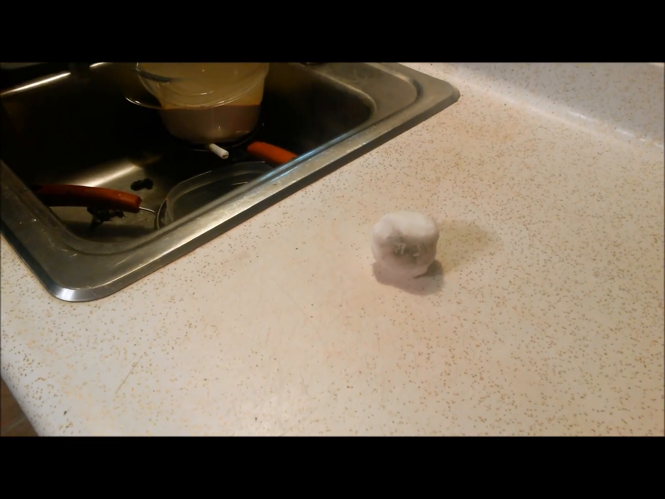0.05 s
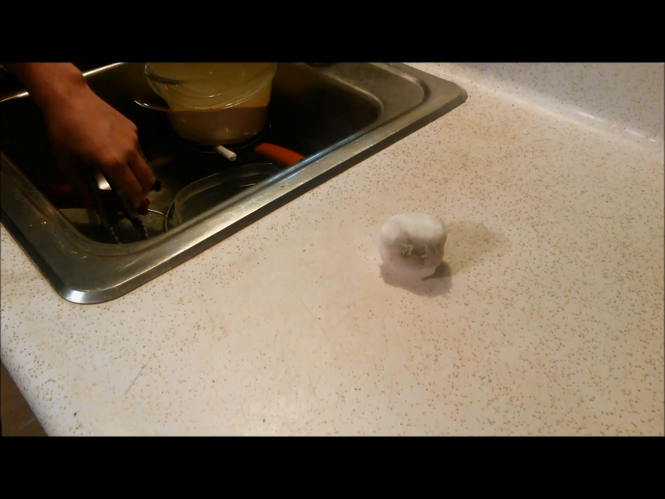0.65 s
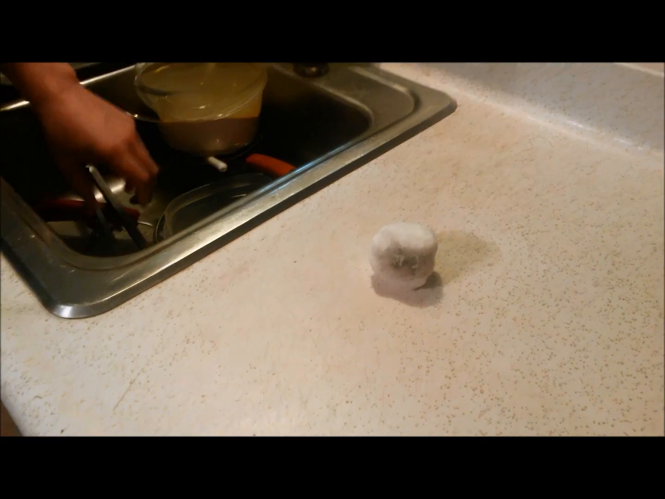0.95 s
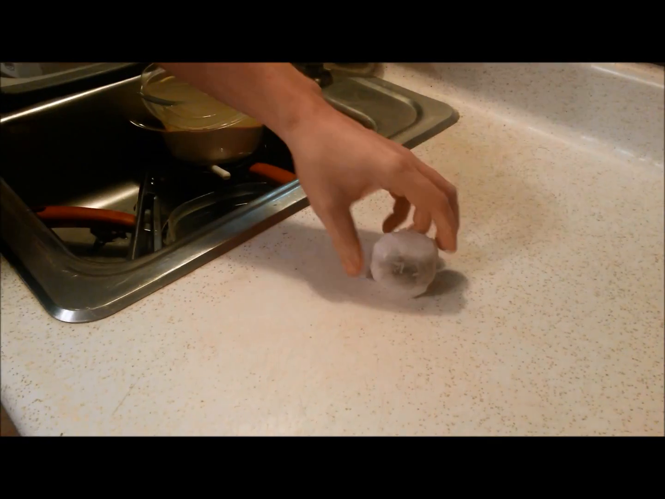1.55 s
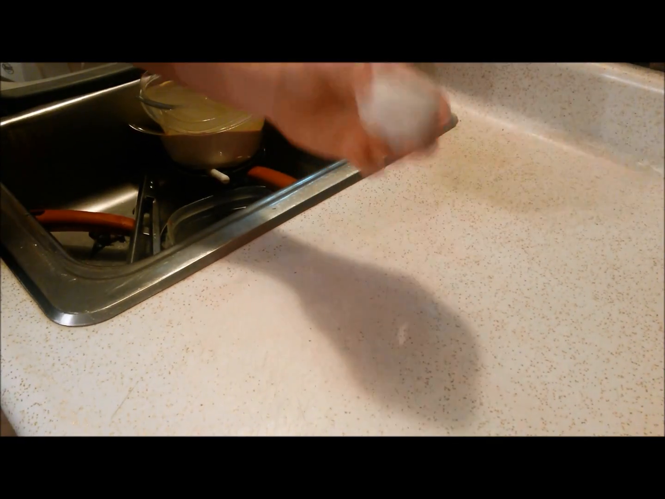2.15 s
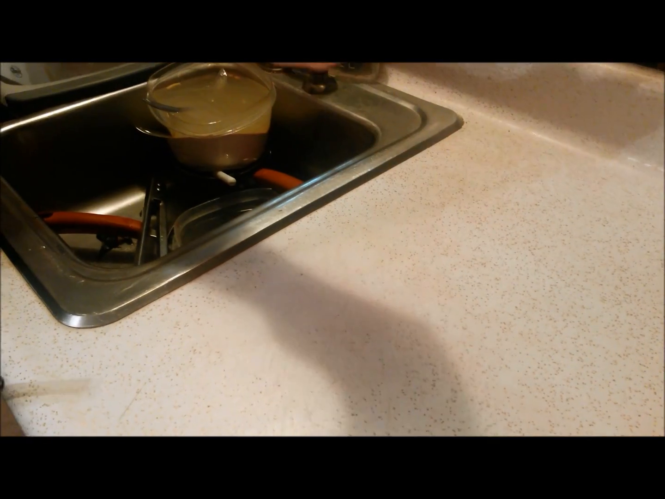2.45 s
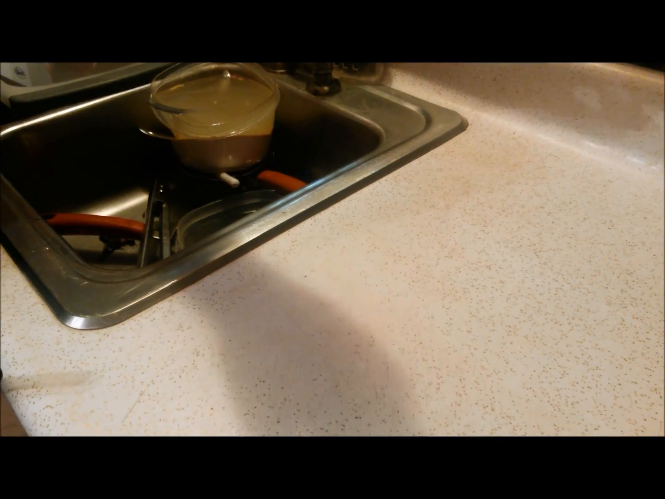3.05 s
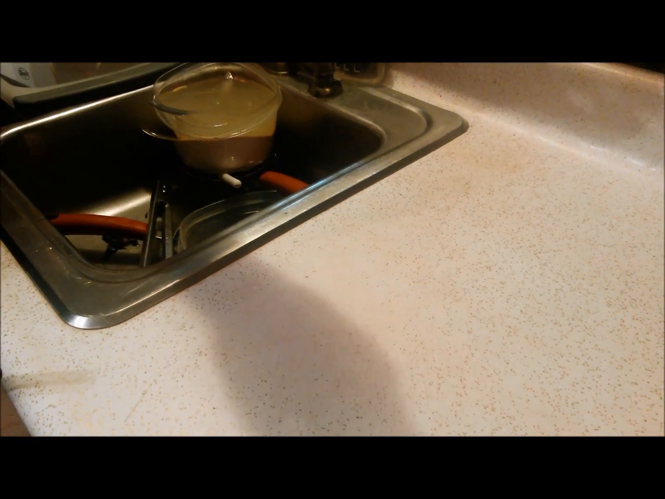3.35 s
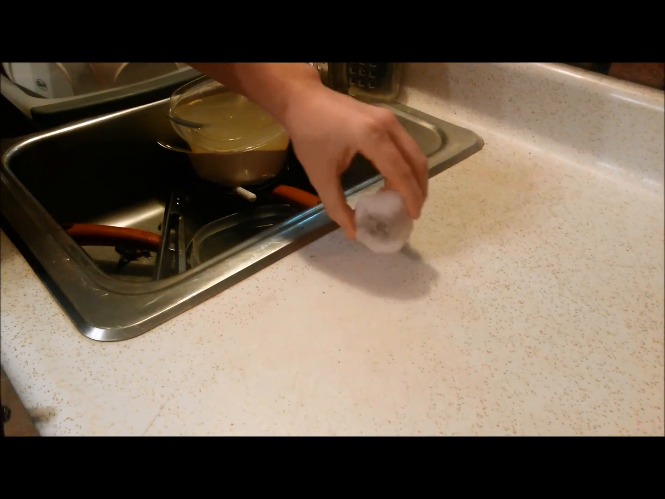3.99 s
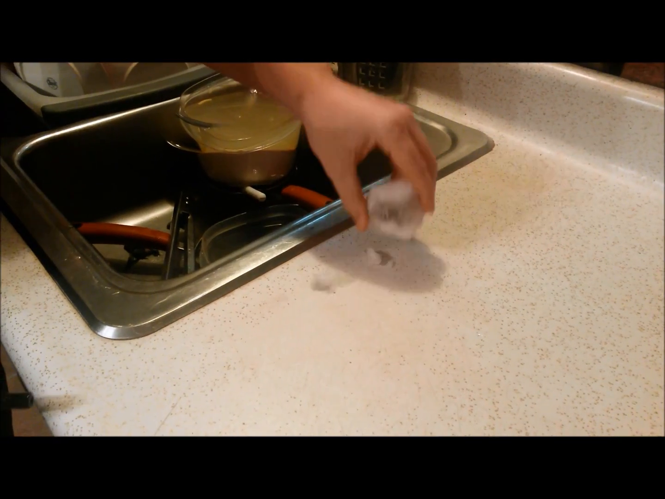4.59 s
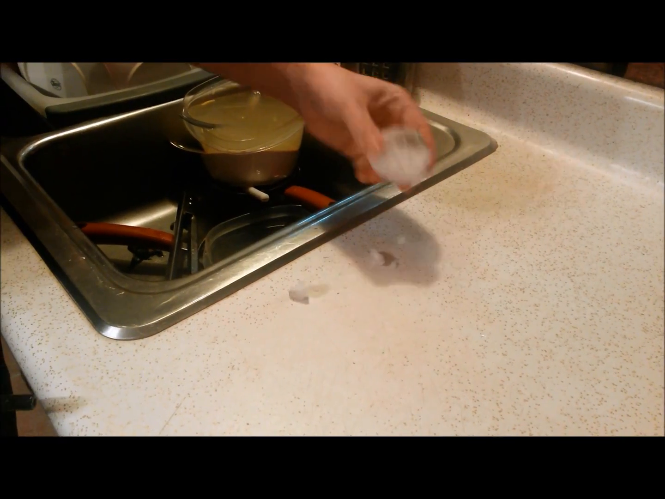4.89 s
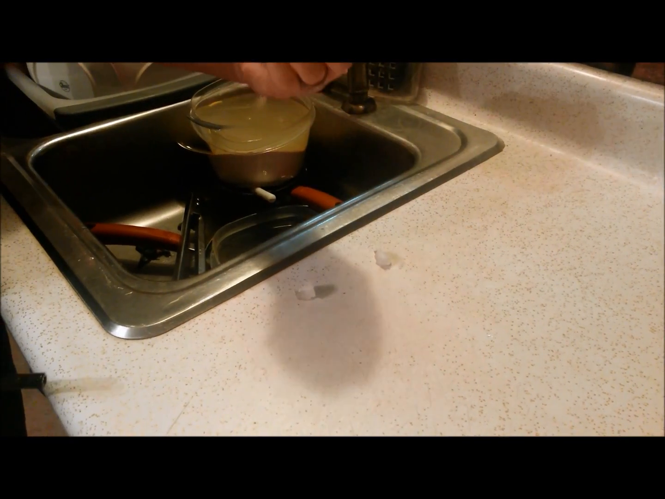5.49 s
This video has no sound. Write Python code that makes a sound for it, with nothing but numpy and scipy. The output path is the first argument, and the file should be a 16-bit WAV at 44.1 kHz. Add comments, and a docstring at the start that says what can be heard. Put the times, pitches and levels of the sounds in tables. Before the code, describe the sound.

In a small kitchen, steel tongs clatter loudly into a steel sink, ringing, then scraping to rest. After a tiny sharp tick and a quieter stretch of soft shuffles, a garlic bulb is knocked four times on the counter, thudding as its dry skin crackles and gives way. Low rumble and sleeve rustle lie underneath, and the nearby camera microphone picks up faint chirps from its focus motor.

```python
"""A small kitchen. Steel tongs clash in a steel sink, ringing arms and basin, then stick and slip to
rest against its wall. A hand lifts a garlic bulb and knocks it four times on the counter, ringing
the slab; the dry skin cracks in runs of tiny snaps and gives way. Low rumble, sleeve rustle and soft
shuffles lie beneath. Heard through the two unlike microphones of a camera whose focus motor chirps."""
import sys
import numpy as np
from scipy import signal
from scipy.fft import rfft, irfft
from scipy.io import wavfile
from scipy.ndimage import uniform_filter1d

SR = 44100
rng = np.random.default_rng(int(sys.argv[2]) if len(sys.argv) > 2 else 0)


def to_wav(sig):
    """Store sig (one row per channel, or 1-D mono) as 16-bit WAV at the path in sys.argv[1].

    Samples outside -1..1 are clipped; the rate is SR.
    """
    pcm = np.clip(np.atleast_2d(sig), -1, 1) * 32767
    pcm = np.round(pcm).astype(np.int16)
    wavfile.write(sys.argv[1], SR, pcm.T)  # frames by channels


N = 248283
TIME_S = np.arange(N) / SR
EVENT_S = TIME_S[:SR // 2]  # time axis of one event

# Tongs on sink. Each row: start in seconds, steel level in dB, tilt in dB per octave,
# relative basin level in dB, basin centre in Hz, ring time factor.
CLASHES = [(0.6967, -23.5, 0, -18, 206, 0.44), (0.7655, -28, -2, -19, 210, 0.49),
           (.793, -24.5, -4.5, -26.5, 235, 0.29), (.938, -10, -3, -13.5, 268, 0.19),
           (.948, -16, -1.5, -31.5, 300, 0.22), (0.9871, -10.5, 0, -22.5, 485, 0.66),
           (1.0432, -11, 0, -18.5, 456, 0.39), (1.070, -18.5, 0, -41.5, 500, 0.57),
           (1.096, -20, -2.5, -22, 436, 0.34), (1.24, -23, 1.5, -41, 290, 0.3),
           (1.272, -22.5, 0.5, -41, 274, 0.31), (1.3276, -27, 0.5, -36, 288, 0.47),
           (1.5047, -30.5, -3.5, -28, 215, 0.5), (1.578, -19.5, 4, -45, 260, 0.37)]
# Tongs dragging. Each row: start in seconds, length in seconds, scrape level in dB, tilt in dB per
# octave, basin drone level in dB, swell in dB per second, left minus right in dB.
DRAGS = [(.80, 0.14, -47, -2.5, -49, -62.5, 6), (1.126, 0.09, -27, -2.5, -30, -82.5, 12.5),
         (1.232, 0.14, -38, -2, -43.5, -7, 6), (1.372, 0.114, -38, 0.5, -39, 13, 5.5),
         (1.491, 0.15, -36, 0.5, -39, -4, -1), (1.622, 0.023, -26.5, 1, -38.5, -23.5, 2.5)]
# Modes of basin, tongs and counter. Each row: frequency in Hz, relative level in dB, T60 in seconds.
BASIN_MODES = [(78, -2, .3), (142, -4, .35), (186, -2, .45), (214, -2, .35), (243, -2, .35), (281, -8, .4),
               (351, -1, .55), (385, -10, .35), (437, 2, .6), (492, -11, .35), (544, -3, .6), (570, -4, .5),
               (639, -1, .45), (679, 0, .35), (770, -9, .3), (975, 3, .45), (1290, 0, .4), (1600, 5, .4)]
TONG_MODES = [(1715, -2, .3), (2245, -7, .45), (2347, -11, .6), (3429, -10, .25), (3828, 3, .3),
              (3967, 1, .28), (4253, -8, .3), (4850, -13, .33), (5230, -10, .7), (5491, -8, .6),
              (5519, -7, .6), (6115, -11, .36), (6880, -12, .35), (7321, -13, .25), (8524, -6, .22),
              (9098, -15, .2), (9442, -14, .45), (10010, -14, .18)]
COUNTER_MODES = [(55.5, -27, 0.48), (77, -15, 0.074), (143.6, 7.5, 0.066), (171, -1, 0.041),
                 (213.7, -3.5, 0.15), (244, -5.5, 0.045), (302.1, -12.5, 0.28), (373, -17, 0.16),
                 (504, -17.5, 0.11), (563, -30.5, 0.42), (770, 6.5, 0.022), (842, -26, 0.17),
                 (1148, -18, 0.26), (1334, -6, 0.067)]
# Bulb on counter. Each row: start in seconds, level in dB, hardness as a cut-off in Hz,
# ring time factor, left minus right in dB.
KNOCKS = [(3.9425, -21, 197, 0.95, 0), (4.141, -12.5, 470, 0.55, 0), (4.3381, -13.5, 363, 0.72, 0.5),
          (4.571, -19.5, 123, 0.9, 3)]
# Skin cracks. Each row: start in seconds, level in dB, length in seconds.
CRACKS = [(.392, -56, 0.0023), (1.9427, -30, 0.00029), (3.940, -32.5, 0.0097), (4.1408, -25.5, 0.0077),
          (4.3374, -15, 0.0015), (4.34, -26.5, 0.0042), (4.433, -39, 0.0016), (4.555, -33.5, 0.012),
          (4.564, -32, 0.021), (4.684, -48.5, 0.0045), (4.7146, -41, 0.0025), (4.805, -58.5, .034)]
# Hand on counter, last as the bulb gives way. Each row: start in seconds, level in dB,
# push time in seconds, hardness as a cut-off in Hz, left minus right in dB.
BUMPS = [(2.8165, -26, 0.0022, 520, 13), (3.302, -26.5, 0.0028, 280, 10), (4.573, -14, 0.002, 1110, 18.5)]
# Finger strokes. Each row: peak time in seconds, relative level in dB, half length in seconds.
RUBS = [(0.015, -62, 0.089), (1.98, -62, 0.082), (2.45, -64, .25), (2.853, -57, .025), (3.07, -59, 0.042),
        (3.537, -61.5, 0.14), (3.745, -51.5, 0.066), (4.5, -46, .015), (4.71, -57.5, 0.13)]
# Soft shuffles. Each row: start in seconds, level in dB, centre in Hz, length in seconds.
SHUFFLES = [(2.237, -51.5, 150, 0.014), (2.393, -50, 500, 0.0047), (2.441, -52, 107, 0.029),
            (2.793, -50, 330, 0.0039), (3.12, -47.5, 467, 0.007), (3.807, -43.5, 503, 0.0048)]
# Focus motor runs. Each row: start in seconds, relative level in dB, length in seconds.
CHIRPS = [(0.114, -51, 0.049), (2.075, -59.5, 0.1), (2.364, -51, 0.046), (2.565, -48.5, 0.072),
          (3.023, -44.5, 0.026), (3.105, -54, 0.055), (3.499, -45.5, 0.033), (3.635, -43.5, 0.087),
          (4.272, -40, 0.049), (4.424, -42.5, 0.036), (4.51, -52, 0.18)]
# Motor resonances. Each row: frequency in Hz, width in Hz, relative level in dB.
MOTOR_BANDS = [(5420, 97, -15.5), (8010, 50, -6), (10530, 420, -10), (11570, 260, -11), (13200, 530, -11)]
# Body movement at the counter. Each row: time in seconds, relative level in dB.
MOVEMENT_DB = [(0, -0.5), (.5, -5.5), (1.95, -5.5), (2.4, 2), (2.8, 2), (3.1, -0.5), (3.75, 2), (4.7, 6),
               (5.15, -2), (5.6, 1.5)]
# Spectra of the sources and the room tail. Each row: frequency in Hz, gain in dB.
STEEL_EQ_DB = [(100, -1.5), (300, 10), (600, 4.5), (850, 1), (1000, 4), (1150, 3), (1700, 4), (1950, 5.5),
               (2300, 5.5), (3000, 3), (3900, 2), (7000, -1), (10000, -4.5), (14000, -6)]
CRACK_EQ_DB = [(200, 11), (800, -1), (2000, 7.5), (4000, 4.5), (7000, 4), (9000, 2.5), (11000, 3),
               (14000, 6)]
RUB_EQ_DB = [(500, -3), (2500, 7.5), (5000, 8), (9000, 6.5), (14000, -4)]
RUMBLE_EQ_DB = [(20, -22), (40, -13), (62, -6), (88, 2.5), (110, -4.5), (140, 1), (190, -10), (300, -16),
                (600, -30.5), (2000, -35), (8000, -61.5)]
RUSTLE_EQ_DB = [(100, -3.5), (350, -4), (700, -4), (1400, -10), (3000, -16.5), (6000, -20.5),
                (14000, -26.5)]
ROOM_EQ_DB = [(100, -7.5), (300, -3), (1000, -0.5), (3000, -11), (6000, -9), (9000, -12), (14000, -13)]
# Decay of sheet steel and room. Each row: frequency in Hz, T60 in seconds.
STEEL_T60_S = [(200, 0.22), (1500, 0.45), (4000, 0.43), (9000, 0.28), (14000, 0.26)]
ROOM_T60_S = [(100, 0.58), (400, 0.39), (1000, 0.34), (3000, 0.43), (8000, 0.29), (14000, 0.24)]
# Likeness of the two channels. Each row: frequency in Hz, left-right correlation.
MIC_CORRELATION = [(40, 1), (130, 0.95), (300, 0.68), (700, 0.24), (1500, 0.24), (3000, 0), (14000, 0.28)]
# Left microphone muffled, right port ringing in the treble. Each row: frequency in Hz, gain in dB.
LEFT_MIC_DB = [(60, 2.5), (200, -0.5), (500, -1), (1000, -5.5), (2000, -3.5), (3800, 2), (5300, 1.5),
               (6200, -8), (7500, -12), (9000, -48.5), (14000, -58.5)]
RIGHT_MIC_DB = [(60, 2), (200, 2.5), (500, 3), (1000, 1.5), (3000, -1), (5000, 0.5), (6800, 4), (7700, 5),
                (8600, 14), (9300, 16), (10300, 7), (11500, 3.5), (14000, -1.5)]


def clashes(ripple, basin_trim_db=-4, highpass_hz=110, chatter_s=0.0022, side_db=4):
    """Blows build as the loose arms chatter; a holding hand cuts the ring short."""
    out = np.zeros((2, N))
    for start_s, steel_db, tilt_db_oct, basin_db, centre_hz, ring in CLASHES:
        clang = amp(steel_db) * tilted(sheet_steel(ripple, ring) + tongs(ring), tilt_db_oct)
        boom = amp(basin_db + basin_trim_db) * basin(centre_hz, ring)
        add(out, start_s, (clang + boom) * np.minimum(EVENT_S / chatter_s, 1))
    return pan(side_db) * butterworth(out, highpass_hz, "high")  # thin steel gives little deep bass


def sheet_ripple(ripple_db=3.3, smooth_bins=24):
    """Hundreds of unequal sheet modes: one random pattern of peaks for all blows."""
    peaks = unit(uniform_filter1d(rng.standard_normal(SR // 4 + 1), smooth_bins))
    return unit(amp(ripple_db * peaks.clip(-2, 2)))


def sheet_steel(ripple, ring):
    """One touch rings the dense modes of the thin steel."""
    modes = irfft(rfft(stereo_noise(len(EVENT_S))) * ripple)
    return colour(decay(modes, STEEL_T60_S, ring), STEEL_EQ_DB)


def tongs(ring, level_db=-16):
    """The arms ring in clear lines."""
    phases_rad = rng.uniform(0, 2 * np.pi, (2, 1, len(TONG_MODES)))
    return amp(level_db) * ringing(TONG_MODES, ring=ring, phases_rad=phases_rad)


def basin(centre_hz, ring, width_oct=0.55, upper_db=-16, hz_per_rad=550):
    """The contact spot picks the modes; high ones reach the microphones out of step."""
    hz = np.transpose(BASIN_MODES)[0]
    near = 1 / (1 + (np.log2(hz / centre_hz) / width_oct) ** 4)
    gains = np.maximum(near, amp(upper_db) * (hz > centre_hz))  # hard steel always stirs upper modes
    shared_rad = rng.uniform(0, 2 * np.pi, len(hz))
    skew_rad = rng.uniform(-1.3, 1, (2, 1, len(hz))) * hz / hz_per_rad
    return ringing(BASIN_MODES, gains, ring, shared_rad + skew_rad, rise_cycles=0.25)


def drags(ripple, attack_s=0.006, release_s=0.0044, highpass_hz=65):
    """Steel sticks and slips on steel; each drag catches, swells or eases, and stops."""
    out, t = np.zeros((2, N)), EVENT_S
    for start_s, length_s, scrape_db, tilt_db_oct, drone_db, swell_db_per_s, side_db in DRAGS:
        pressure = np.minimum(t / attack_s, 1) * amp(swell_db_per_s * np.minimum(t, length_s))
        release = np.exp(-np.maximum(t - length_s, 0) / release_s)
        slips = grains(len(t), per_s=1400, spread_db=3) * pressure * release
        drone = basin(centre_hz=140, ring=0.22, width_oct=1.0, upper_db=-12)
        drone = unit(butterworth(drone, highpass_hz, "high"))
        scrape = tilted(unit(sheet_steel(ripple, ring=0.26)), tilt_db_oct)
        body = amp(scrape_db) * scrape + amp(drone_db) * drone
        add(out, start_s, pan(side_db) * convolve(slips, body / np.sqrt(len(t))))
    return out


def knocks(spot_spread_db=2):
    """The bulb thuds on the slab, which swings up over a cycle; harder blows reach higher modes."""
    out = np.zeros((2, N))
    hz = np.transpose(COUNTER_MODES)[0]
    signs = (-1) ** np.arange(len(hz))  # neighbouring modes move in opposition
    for start_s, level_db, cutoff_hz, ring, side_db in KNOCKS:
        spot = amp(spot_spread_db * rng.standard_normal(len(hz)))  # each spot favours other modes
        gains = spot * signs / np.hypot(1, hz / cutoff_hz)
        thud = ringing(COUNTER_MODES, gains, ring, rise_cycles=0.87)
        add(out, start_s, amp(level_db) * pan(side_db) * thud)
    return out


def cracks(big_energy_db=-38, big_edge_hz=330, small_edge_hz=2780, db_per_oct=9.5, side_db=0.5):
    """Papery skin cracks in quick runs of tiny snaps; bigger cracks reach lower."""
    out, t = np.zeros((2, N)), TIME_S[:4096]
    for start_s, level_db, length_s in CRACKS:
        window = np.exp(-(t / length_s) ** 4)
        snaps = np.array([grains(len(t), per_s=9000, spread_db=4.5) * window for _ in range(2)])
        snaps *= np.sqrt(length_s * SR) / (np.linalg.norm(snaps, axis=1, keepdims=True) + 1e-9)
        energy_db = level_db + 10 * np.log10(length_s)
        shift_oct = max(big_energy_db - energy_db, 0) / db_per_oct
        edge_hz = min(big_edge_hz * 2 ** shift_oct, small_edge_hz)
        add(out, start_s, amp(level_db) * colour(butterworth(snaps, edge_hz, "high"), CRACK_EQ_DB))
    return pan(side_db) * out


def ringing_tick(start_s=1.9418, level_db=-19.5, mic_ring_hz=9200, t60_s=0.0047):
    """A tiny sharp tick as the bulb is lifted, ringing in the right microphone's treble resonance."""
    out = np.zeros((2, N))
    add(out, start_s, ringing([(mic_ring_hz, level_db, t60_s)], rise_cycles=4))
    return out


def bumps(tick_db=-28, highpass_hz=75):
    """A hand lands: one short, dry push and a faint contact tick."""
    out = np.zeros((2, N))
    for start_s, level_db, push_s, cutoff_hz, side_db in BUMPS:
        progress = TIME_S[:SR // 10] / push_s
        push = (progress - 1) * np.exp(-progress)
        bump = butterworth(push, cutoff_hz, "low") + amp(tick_db) * push
        add(out, start_s, amp(level_db) * pan(side_db) * bump)
    return butterworth(out, highpass_hz, "high")


def rubs(trim_db=-4):
    """Fingertips brush the dry skin; strokes swell and fade."""
    pressure = sum(amp(db) * np.exp(-((TIME_S - peak_s) / half_s) ** 2) for peak_s, db, half_s in RUBS)
    grit = np.array([grains(N, per_s=4000, spread_db=1.4) for _ in range(2)])
    return amp(trim_db) * pressure * unit(colour(grit, RUB_EQ_DB))


def shuffles(side_db=3, rise_s=0.0005):
    """Dull bumps of someone shifting at the counter."""
    out, t = np.zeros((2, N)), TIME_S[:8192]
    for start_s, level_db, centre_hz, length_s in SHUFFLES:
        burst = stereo_noise(len(t)) * pulse(t, rise_s, length_s)
        puff = butterworth(burst, [centre_hz / 2, centre_hz * 2], "band", order=3)
        puff *= np.sqrt(length_s * SR / np.mean(np.sum(puff ** 2, 1)))
        add(out, start_s, amp(level_db) * pan(side_db) * puff)
    return out


def focus_motor(trim_db=-3, rise_s=0.014):
    """The lens motor buzzes briefly in its narrow resonances."""
    drive = np.zeros((2, N))
    for start_s, level_db, length_s in CHIRPS:
        add(drive, start_s, amp(level_db) * pulse(EVENT_S, rise_s, length_s))
    noise = stereo_noise(N)
    whine = sum(amp(db) * unit(signal.lfilter(*signal.iirpeak(hz, hz / width_hz, SR), noise))
                for hz, width_hz, db in MOTOR_BANDS)
    return amp(trim_db) * drive * whine


def background(rumble_db=-53, rustle_db=-61, rumble_follow=0.85):
    """Low rumble and sleeve rustle, both following the movement."""
    movement_db = np.interp(TIME_S, *np.transpose(MOVEMENT_DB))
    rumble = pan(side_db=1) * unit(colour(stereo_noise(N), RUMBLE_EQ_DB))
    rustle = pan(side_db=5) * unit(colour(stereo_noise(N), RUSTLE_EQ_DB))
    return amp(rumble_db + rumble_follow * movement_db) * rumble + amp(rustle_db + movement_db) * rustle


def kitchen_echo(x, predelay_s=0.006):
    """Short diffuse tail from hard walls and cupboards."""
    tail = decay(stereo_noise(len(EVENT_S)), ROOM_T60_S) * (EVENT_S > predelay_s)
    return convolve(x, colour(tail / np.linalg.norm(tail[0]), ROOM_EQ_DB))


def ringing(modes, gains=1, ring=1, phases_rad=0, rise_cycles=0.073):
    """Sum of sines that build up and die; ring scales T60."""
    hz, db, t60_s = np.transpose(modes)
    t = EVENT_S[:, None]
    rise = 1 - np.exp(-t * hz / rise_cycles)
    fall = np.exp(-np.log(1000) * t / (t60_s * ring))
    return (gains * amp(db) * rise * fall * np.sin(2 * np.pi * hz * t + phases_rad)).sum(-1)


def grains(count, per_s, spread_db):
    """Random micro-slips, a few much larger than the rest."""
    sizes = amp(spread_db * np.minimum(rng.exponential(1, count), 4))
    signs = rng.choice([-1, 1], count)
    return unit(sizes * signs * (rng.random(count) < per_s / SR))


def stereo_noise(count):
    """White noise at two close microphones: alike in the bass, barely so in the treble."""
    left, other = rfft(rng.standard_normal((2, count)))
    correlation = np.clip(lookup(MIC_CORRELATION, np.fft.rfftfreq(count, 1 / SR)), -1, 1)
    right = correlation * left + np.sqrt(1 - correlation ** 2) * other
    return irfft(np.array([left, right]), count)


def pulse(t, rise_s, length_s):
    """Linear rise, Gaussian fall."""
    return np.minimum(t / rise_s, 1) * np.exp(-(t / length_s) ** 2)


def decay(x, t60_table, ring=1, size=256):
    """Each band dies at its own rate."""
    hz, t, bands = signal.stft(x, SR, nperseg=size)
    loss = np.exp(-np.log(1000) * t / (ring * lookup(t60_table, hz)[:, None]))
    return signal.istft(bands * loss, SR, nperseg=size)[1][:, :x.shape[1]]


def tilted(x, tilt_db_oct):
    """Spectral tilt about 3 kHz."""
    return colour(x, [(hz, tilt_db_oct * np.log2(hz / 3000)) for hz in (750, 12000)])


def colour(x, eq_db, size=4096):
    """Causal filter built from a gain table."""
    log_gain = np.log(amp(lookup(eq_db, abs(np.fft.fftfreq(size, 1 / SR)))))
    spectrum = np.exp(np.conj(signal.hilbert(log_gain)))
    return convolve(x, np.fft.ifft(spectrum).real[:size // 2])


def butterworth(x, edge_hz, kind, order=2):
    """Causal low-, high- or band-pass."""
    return signal.lfilter(*signal.butter(order, edge_hz, kind, fs=SR), x)


def convolve(x, response):
    """Convolution cut to the length of x."""
    return signal.fftconvolve(np.atleast_2d(x), np.atleast_2d(response), axes=1)[:, :x.shape[-1]]


def lookup(table, hz):
    """Interpolates on a log-frequency axis."""
    table_hz, values = np.transpose(table)
    return np.interp(np.log(hz + 1), np.log(table_hz + 1), values)


def add(mix, start_s, sound):
    """Mixes a sound in."""
    part = mix[:, max(round(start_s * SR), 0):][:, :sound.shape[-1]]
    part += sound[..., :part.shape[1]]


def pan(side_db):
    """Channel gains; positive is left."""
    return amp(np.array([[side_db], [-side_db]]) / 2)


def amp(db):
    """Decibels to gain."""
    return 10 ** (np.asarray(db) / 20)


def unit(x):
    """Scales to rms 1."""
    return x / np.sqrt(np.mean(x ** 2) + 1e-20)


def scene(sink_send_db=-6, thud_send_db=-5):
    """Sink, garlic and background in the kitchen."""
    ripple = sheet_ripple()
    sink = clashes(ripple) + drags(ripple)
    thuds = knocks() + shuffles()
    skin = cracks()
    echo = kitchen_echo(amp(sink_send_db) * sink + amp(thud_send_db) * thuds + skin)
    return sink + thuds + skin + echo + ringing_tick() + bumps() + rubs() + focus_motor() + background()


def record(dry, left_limit=0.34, hiss_db=-63, full_scale=0.92, edge_hz=14650):
    """Two microphone colours, left overload, circuit hiss, hard limit, band limit."""
    left = left_limit * np.tanh(colour(dry[0], LEFT_MIC_DB) / left_limit)
    right = colour(dry[1], RIGHT_MIC_DB)
    both = np.vstack([left, right]) + amp(hiss_db) * rng.standard_normal((2, N))
    lowpass = signal.firwin(401, edge_hz, window=("kaiser", 8), fs=SR)
    return signal.oaconvolve(np.clip(both, -full_scale, full_scale), lowpass[None], "same")


dry = scene()
out = record(dry)
to_wav(out)
```